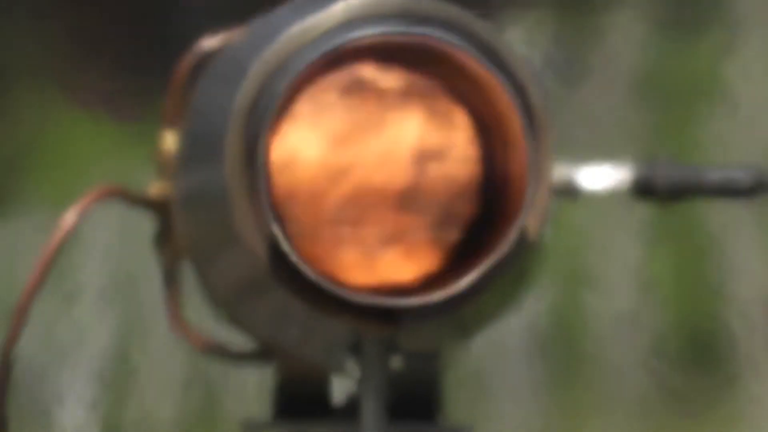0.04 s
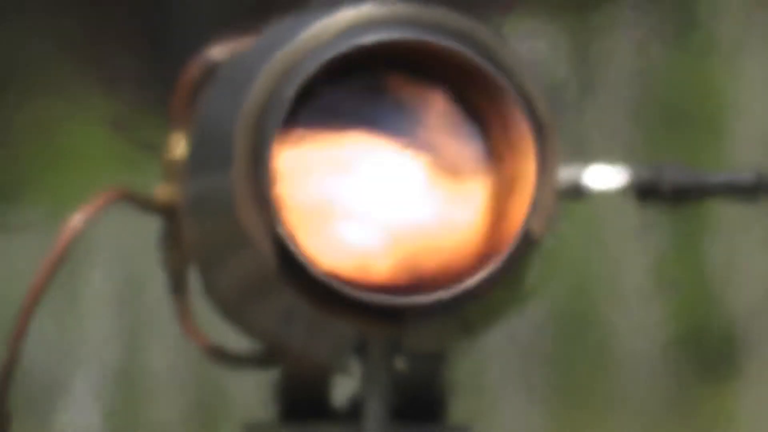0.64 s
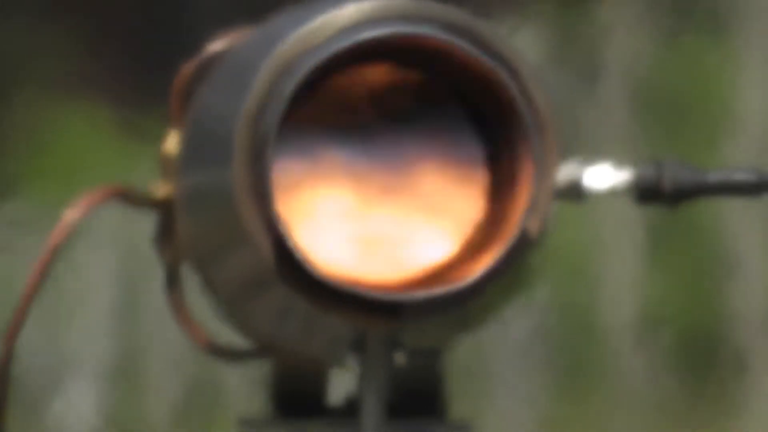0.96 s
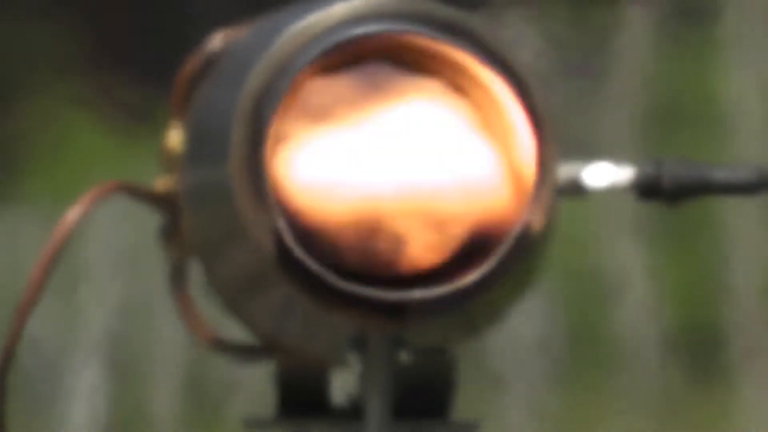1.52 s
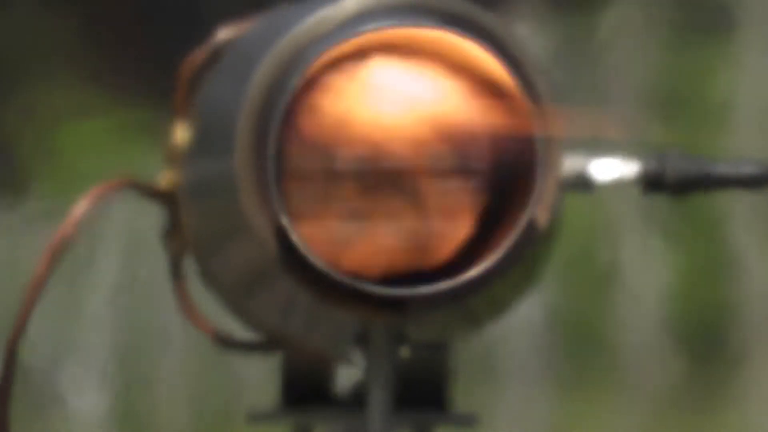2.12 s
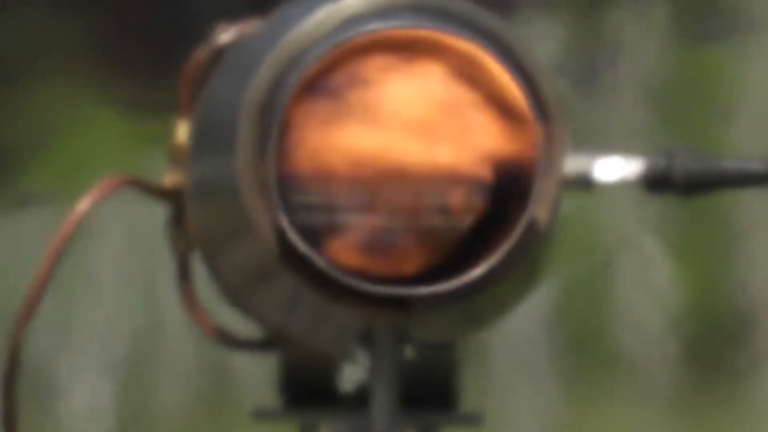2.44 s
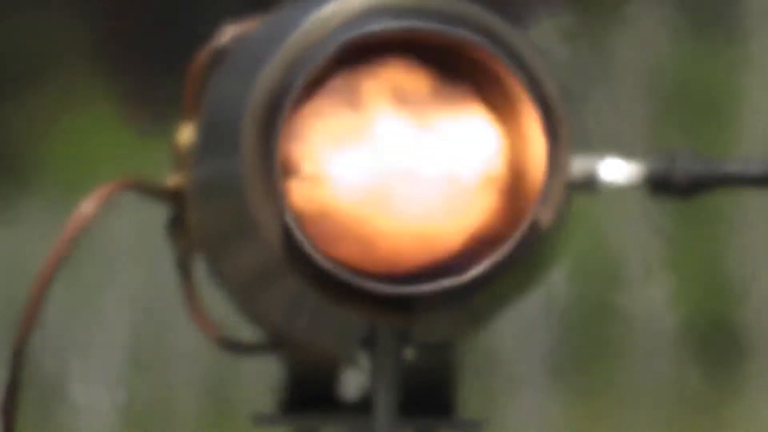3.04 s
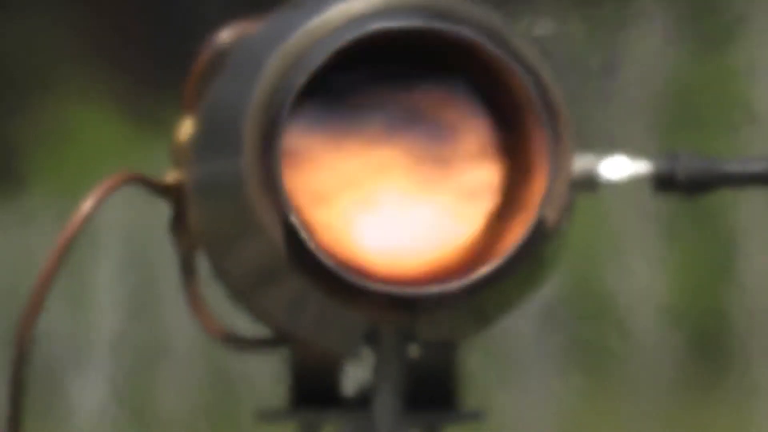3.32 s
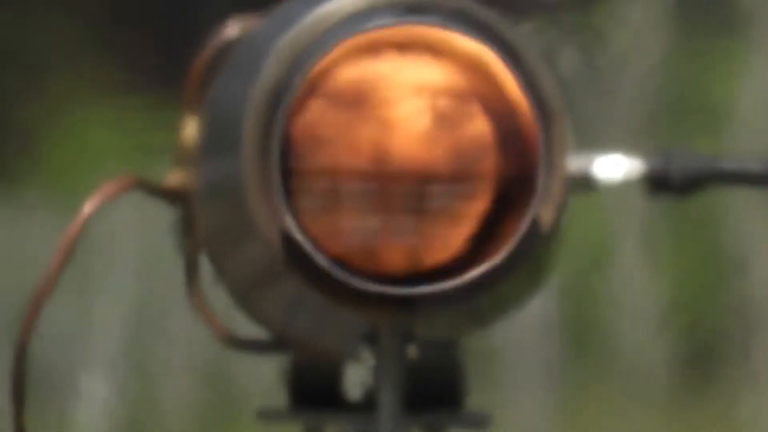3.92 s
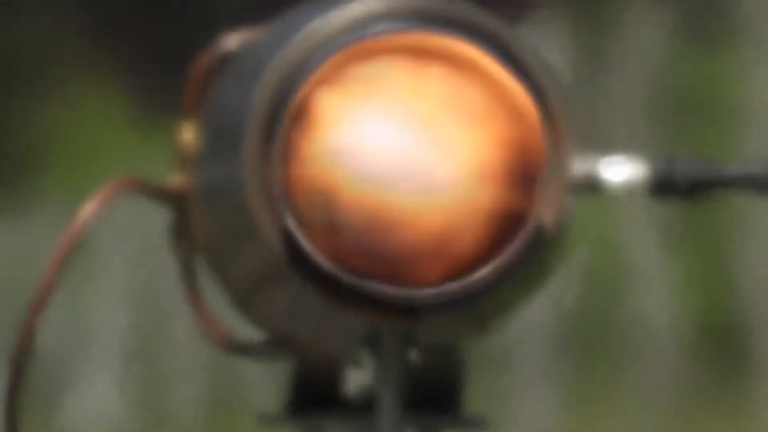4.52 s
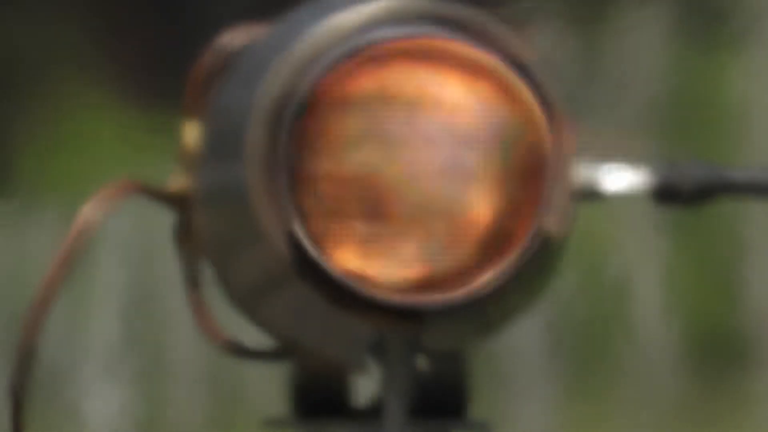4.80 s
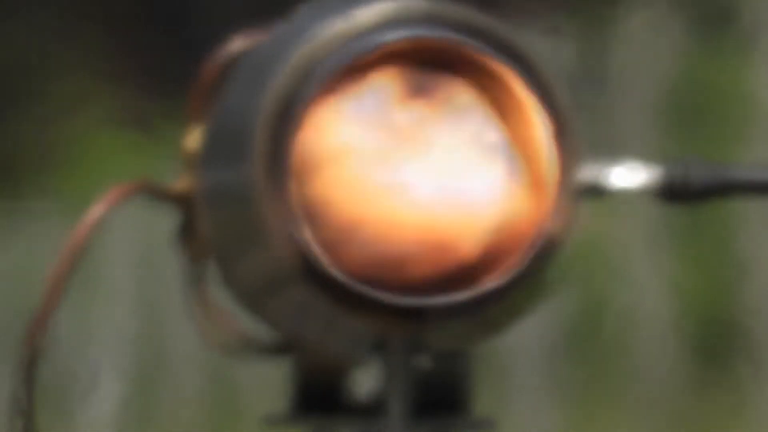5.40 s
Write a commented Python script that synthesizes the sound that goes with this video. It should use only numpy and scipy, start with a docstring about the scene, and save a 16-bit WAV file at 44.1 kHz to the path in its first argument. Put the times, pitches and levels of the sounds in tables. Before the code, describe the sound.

A small pulsejet engine runs outdoors, its bangs coming so fast that they merge into a rough, low buzz. Gritty crackle rides on each firing, over a hollow pipe hum, a deep rumble and rushing exhaust. It starts ragged, settles with occasional skipped beats and sharp cracks, then grows slightly weaker and more sputtery near the end. The sound is wide in stereo, with no echo.

```python
"""A small pulsejet runs on a stand outdoors, firing about 89 times a second, a little unevenly.
Each firing is a pressure front with a crackling shock, and sets the pipe's standing waves ringing.
Under it the gas column hums and the chamber rumbles; the exhaust roars and spits stray pops.
The burn is ragged at first, skips a beat now and then, and grows weaker and ragged near the end."""
import sys
import numpy as np
from scipy import signal
from scipy.fft import rfft, irfft, next_fast_len
from scipy.io import wavfile
from scipy.ndimage import uniform_filter1d, map_coordinates

SR = 44100
rng = np.random.default_rng(int(sys.argv[2]) if len(sys.argv) > 2 else 0)


def int16_out(signal):
    """Quantize to a 16-bit WAV file."""
    q = np.round(np.clip(np.atleast_2d(signal).T, -1, 1) * 32767)
    wavfile.write(sys.argv[1], SR, q.astype(np.int16))


N = 244755


def amp(db):
    """Decibels to gain."""
    return 10 ** (np.asarray(db) / 20)


def levelled(x, window):
    """Ride the gain to hold x near rms 1 over a sliding window of samples."""
    power = uniform_filter1d(np.mean(x ** 2, axis=0), window)
    return x / np.sqrt(np.abs(power) + 1e-12)


def along(points, hz):
    """Read (Hz, value) points on a log frequency axis."""
    f, v = np.transpose(points)
    return np.interp(np.log(hz + 1), np.log(f + 1), v)


def automation(rows):
    """Join (seconds, value) points with ramps, one value per sample."""
    return np.interp(np.arange(N) / SR, *np.transpose(rows))


def wobble(rate):
    """A smooth random curve, rate knots a second."""
    knots = rng.standard_normal(int(N * rate / SR) + 4)
    return map_coordinates(knots, [np.arange(N) * rate / SR])


def filtered(x, response):
    """Pass x through a complex frequency response."""
    size = next_fast_len(N + SR // 4)
    return irfft(rfft(x, size) * response(np.fft.rfftfreq(size, 1 / SR)), size)[..., :N]


def coloured(x, spectrum, size=4096):
    """Minimum-phase stereo EQ: nothing rings ahead of an attack."""
    gain = amp(along(spectrum, np.fft.rfftfreq(size, 1 / SR)))
    cepstrum = irfft(np.log(gain))
    cepstrum[1:size // 2] *= 2
    cepstrum[size // 2 + 1:] = 0
    impulse = irfft(np.exp(rfft(cepstrum)))
    return signal.fftconvolve(x, impulse[None], axes=1)[:, :N]


def impulses(at, gain, scatter_db):
    """Impulses at sample positions, their sizes scattered by chance."""
    sizes = gain * amp(scatter_db * np.clip(rng.standard_normal(len(at)), -2, 2))
    return np.bincount(np.clip(at, 0, N - 1).astype(int), sizes, N)


def cued_hits(rows):
    """One impulse for each (seconds, dB) row."""
    start_s, db = np.transpose(rows)
    return np.bincount((start_s * SR).astype(int), amp(db), N)


def beats(cycles, ragged, jitter_ms, ragged_ms):
    """Sample positions of one ignition per cycle, early or late by chance."""
    at = np.flatnonzero(np.diff(np.floor(cycles)))
    late_ms = rng.standard_normal(len(at)) * (jitter_ms + ragged_ms * ragged[at] ** 2)
    at = (at + late_ms * SR / 1000).astype(int)
    return at[(at > 0) & (at < N)]


# Stereo image of the turbulence. Each row: frequency in Hz, left-right coherence (1 is mono).
COHERENCE = [(50, 0.21), (300, 0.15), (1000, 0.087), (2000, 0.13), (3500, 0.52), (6500, 0.76), (10000, .6),
             (15000, 0.23)]

def turbulence():
    """White stereo noise, wide in the lows and narrower in the treble."""
    def mid_side_gains(hz):
        angle = np.arccos(np.clip(along(COHERENCE, hz), -1, 1)) / 2
        return np.array([np.cos(angle), np.sin(angle)])
    mid, side = filtered(rng.standard_normal((2, N)), mid_side_gains)
    return np.array([mid + side, mid - side])


def pumped_noise(cycles, spectrum, pump_db, flutter_db):
    """Turbulent gas at rms 1, pumped by each outflow and fluttering by chance."""
    surge = amp(pump_db * np.cos(2 * np.pi * cycles) + flutter_db * wobble(70))
    gas = coloured(surge * turbulence(), spectrum)
    return gas / np.sqrt(np.mean(gas ** 2) + 1e-20)


# Tone of the rumble. Each row: frequency in Hz, relative level in dB.
RUMBLE_EQ = [(20, -10), (40, -9), (70, 1.5), (130, -2.5), (200, 1.5), (300, 5), (450, 3.5), (700, -5.5),
             (1500, -22.5), (4000, -56)]

def chamber_rumble(cycles):
    """Deep turbulence in the chamber swells with each firing."""
    return pumped_noise(cycles, RUMBLE_EQ, pump_db=1.5, flutter_db=0.1)


# Fader ride on the hum's octave. Each row: time in seconds, level in dB before trim and waver.
OCTAVE_RIDE = [(0.0, -47), (0.45, -41.5), (0.5, -45.5), (1.49, -43), (2.55, -45.5), (2.68, -40),
               (3.19, -43.5), (3.28, -41), (4.67, -43.2), (4.78, -54), (4.84, -39), (4.93, -44.5),
               (5.38, -48.9), (5.54, -44.7)]

def pipe_hum(cycles, bang_db):
    """The gas column swings at the firing rate, at its octave and faintly at the third harmonic."""
    phase = 2 * np.pi * cycles
    octave_db = automation(OCTAVE_RIDE) + 0.43 + 0.41 * wobble(25)
    octave = amp(octave_db) * np.cos(2 * phase + 1.5 + .12 * wobble(30))  # leads each firing
    throb_db = -43 - 1.16 * np.arange(N) / SR  # the fundamental slowly sags
    throb = amp(throb_db + 1.4 * wobble(18)) * np.sin(phase + 0.52 * wobble(20))
    third = amp(bang_db - 28 + 3 * wobble(22.3)) * np.sin(3 * phase + 0.71 * wobble(25))
    return np.sqrt(2) * (octave + throb + third)


# Tone of the roar. Each row: frequency in Hz, relative level in dB.
ROAR_EQ = [(60, -19), (300, -13), (550, -9), (900, 1), (1600, 3), (3300, -1.5), (5000, -14), (8000, -16.5),
           (16000, -24.5)]

def exhaust_roar(cycles):
    """The turbulent jet: a midrange rush that swells between firings."""
    return pumped_noise(cycles, ROAR_EQ, pump_db=-1.3, flutter_db=1.33)


def stray_pops(cycles, ragged, early_share, strays_per_s):
    """Pockets of fuel go off a third of a cycle early, or at any time when the burn is ragged."""
    early = beats(cycles + 1 / 3, ragged, jitter_ms=.6, ragged_ms=1.2)
    early = early[rng.random(len(early)) < early_share + ragged[early]]
    stray = np.flatnonzero(rng.random(N) < strays_per_s * ragged / SR)
    return impulses(early, 1, scatter_db=1.5) + impulses(stray, 0.45, scatter_db=0)


def crackle(hits, spectrum, burst_ms, halo_ms, halo_db, scatter_db):
    """A very short burst of shocklets swells and fades around each hit, in a faint halo of sizzle."""
    from_hit_ms = np.abs(np.arange(-SR // 100, SR // 100)) * 1000 / SR
    envelope = np.exp(-from_hit_ms / burst_ms) + amp(halo_db) * np.exp(-from_hit_ms / halo_ms)
    bursts = signal.fftconvolve(hits * amp(scatter_db * wobble(90)), envelope, "same")
    return coloured(bursts * turbulence(), spectrum)


# Tone of the spits. Each row: frequency in Hz, relative level in dB.
SPIT_EQ = [(300, -19), (1500, -3.5), (3000, -2), (4200, 1), (6000, -3), (8000, -7), (12000, -10),
           (16000, -12)]
# The sharpest cracks. Each row: start in seconds, level in dB over a plain firing, before levelling.
CRACK_CUES = [(1.3303, 9), (1.6346, 6), (2.6643, 0), (2.7302, 4), (3.2998, -11), (3.5806, -2), (4.534, 10),
              (4.999, 1)]

def flame_spits(hits):
    """The flame's bright top layer: a tight tick on every hit, plus a few cued cracks."""
    hits = hits + cued_hits(CRACK_CUES)
    ticks = crackle(hits, SPIT_EQ, burst_ms=0.17, halo_ms=7, halo_db=-25.5, scatter_db=1)
    return levelled(ticks, window=7000)


# Tone of the shocks. Each row: frequency in Hz, relative level in dB.
SHOCK_EQ = [(100, -44), (800, -4), (1500, -6.5), (2300, -6.5), (3300, -2.5), (4500, -7.5), (7000, -12),
            (16000, -28.5)]

def shock_crackle(hits):
    """The shock riding on each pressure front gives it a gritty bite."""
    grit = crackle(hits, SHOCK_EQ, burst_ms=0.39, halo_ms=6.6, halo_db=-28.5, scatter_db=2)
    return levelled(grit, window=2500)


# Standing waves. Each row: frequency in Hz, width in Hz, ring level in dB against the direct sound.
STANDING_WAVES = [(173, 21, 3.5), (343, 16, -20.5), (517, 7.6, -8)]

def pipe_ring(x):
    """The direct sound, with the pipe's standing waves ringing on after it."""
    def modes(hz):
        return sum(amp(db) * 1j * hz * width / (centre ** 2 - hz ** 2 + 1j * hz * width)
                   for centre, width, db in STANDING_WAVES)
    return filtered(x, lambda hz: 1 + modes(hz))


# Pace of the pipe's oscillation. Each row: time in seconds, firing rate in Hz.
FIRING_RATE = [(0.0, 88.54), (1.99, 87.78), (2.07, 93.4), (2.16, 86.65), (2.25, 91.6), (2.32, 86.24),
               (2.62, 89.38), (2.82, 85.2), (2.91, 91.1), (3.46, 88.93), (3.51, 93.27), (3.63, 85.38),
               (3.78, 92.03), (3.85, 86.62), (4.22, 93.26), (4.27, 87.44), (5.08, 91.92), (5.54, 90.1)]
# How unevenly the charge ignites. Each row: time in seconds, raggedness from 0 to 1.
RAGGEDNESS = [(0, 0.9), (.22, 0.8), (.36, .25), (.8, 0.13), (1.1, 0.32), (1.4, 0.12), (2.5, 0.16),
              (2.8, 0.09), (3.87, 0.09), (3.95, 0.43), (4.02, .15), (4.55, .12), (5, .9), (5.55, 1)]
# The flame flaring and sinking. Each row: time in seconds, crackle level in dB before layer trims.
FLAME_RIDE = [(0.0, -40.2), (0.17, -38.5), (0.55, -46.5), (1.19, -39.5), (1.39, -43.5), (2.5, -41),
              (3.0, -46.5), (3.05, -41), (3.17, -49), (3.24, -42.5), (3.83, -43.5), (3.95, -38.5),
              (4.02, -46), (4.15, -41.5), (4.25, -49.5), (4.75, -46), (4.86, -48.5), (5.54, -48)]

def burn(fade_from_s, fade_db_per_s):
    """The burn's control curves: cycles fired so far, bang level, crackle level and raggedness."""
    rate_hz = automation(FIRING_RATE) + .7 * wobble(13)  # the rate hunts around its course
    bang_db = -37.6 - fade_db_per_s * np.maximum(np.arange(N) / SR - fade_from_s, 0)
    crackle_db = automation(FLAME_RIDE) + 1.36 * wobble(20)  # the flame flickers
    return np.cumsum(rate_hz) / SR, bang_db, crackle_db, np.clip(automation(RAGGEDNESS), 0, 1)


# Bangs after a skip. Each row: start in seconds, level in dB over a plain firing, before levelling.
RELIGHT_CUES = [(.622, -1), (2.313, -3), (2.884, -7), (3.999, -1), (4.033, 0), (5.095, 3)]

def firings(cycles, ragged):
    """The main ignitions, nearly equal in size; before a relight the charge fails to catch."""
    at = beats(cycles, ragged, jitter_ms=.22, ragged_ms=1.9)
    to_relight_s = np.transpose(RELIGHT_CUES)[0] - at[:, None] / SR
    skipped = np.any((to_relight_s < .014) & (to_relight_s > -.005), axis=1)
    return impulses(at[~skipped], 1, scatter_db=.8) + cued_hits(RELIGHT_CUES)


# Tone of a pressure front. Each row: frequency in Hz, relative level in dB.
FRONT_EQ = [(30, -41), (100, -10.5), (220, -15), (350, 1), (480, 2.5), (640, 0.4), (780, 1.3), (1000, -1),
            (1400, -3), (2200, -7), (3200, -12.5), (5000, -23.5), (16000, -37.5)]

def pressure_fronts(hits, sway_rad, swing_hz):
    """Each hit sends out a steep pressure front; the wandering flame throws it left or right."""
    pan = np.pi / 4 + sway_rad * np.tanh(wobble(120))
    panned = hits * np.array([np.cos(pan), np.sin(pan)])
    # all-pass: the lows lag, so each front dips and then swings back over
    swung = filtered(panned, lambda hz: (swing_hz - 1j * hz) / (swing_hz + 1j * hz))
    return levelled(coloured(swung, FRONT_EQ), window=2500)


def scene():
    """The pulsejet mix: one oscillation clocks the bangs, crackle, roar, rumble and hum."""
    cycles, bang_db, crackle_db, ragged = burn(fade_from_s=4.09, fade_db_per_s=2.07)
    flame_db = (bang_db + crackle_db) / 2
    fired = firings(cycles, ragged)
    pops = stray_pops(cycles, ragged, early_share=0.22, strays_per_s=190)
    # a weak, ragged burn loses its fronts and blurs into a rush
    blur = ragged * np.clip(-38.5 - bang_db, 0, 5)
    fronts = pressure_fronts(fired + amp(-8) * pops, sway_rad=0.34, swing_hz=710)
    bangs = amp(bang_db + 3 - 0.48 * blur) * fronts
    roar = amp(flame_db - 1.5 + 1.3 * ragged + 0.31 * blur) * exhaust_roar(cycles)
    shocks = amp(flame_db - 2) * shock_crackle(fired + amp(-7.5) * pops)
    spits = amp(crackle_db + 1.62) * flame_spits(fired + pops)
    rumble = amp(bang_db - 1) * chamber_rumble(cycles)
    return pipe_ring(bangs + rumble) + shocks + spits + roar + pipe_hum(cycles, bang_db)


# Balance of the microphone pair. Each row: frequency in Hz, left minus right in dB.
MIC_BALANCE = [(90, -1), (130, -13.5), (180, 1.5), (380, 3.5), (500, 1.5), (650, 0), (1000, -1), (1500, -2),
               (2400, -2), (4000, -0.5), (15000, 0)]
# Phase between the microphones. Each row: frequency in Hz, lag of the left side in radians.
MIC_LAG = [(30, -0.63), (90, -1.9), (130, -0.17), (180, 0.76), (400, 0.66), (650, 1.76), (1500, 1.57),
           (1900, 1.34), (2400, 0.8), (15000, -0.57)]

def microphones(x, notch_hz, width_hz, notch_db):
    """The two sides differ in colour and phase, and share one narrow notch."""
    def response(hz):
        lean_db = along(MIC_BALANCE, hz) / 2
        left = amp(lean_db) * np.exp(-1j * along(MIC_LAG, hz))
        notch = amp(notch_db * np.exp(-((hz - notch_hz) / width_hz) ** 2))
        return np.array([left, amp(-lean_db)]) * notch
    return filtered(x, response)


def record(dry):
    """The microphone pair colours the sound, the tallest spikes round off and the very top is cut."""
    headroom, top_hz = .25, 15900
    heard = microphones(dry, notch_hz=2470, width_hz=100, notch_db=-1.5)
    rounded = heard / (1 + (heard / headroom) ** 4) ** (1 / 4)
    return filtered(rounded, lambda hz: hz < top_hz)


dry = scene()
out = record(dry)
int16_out(out)
```